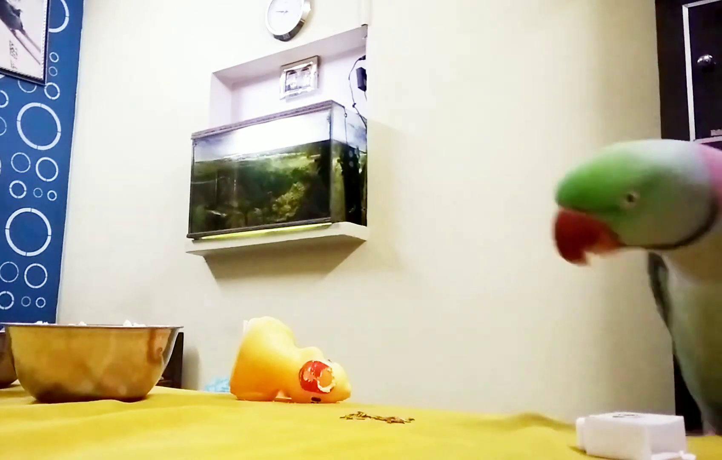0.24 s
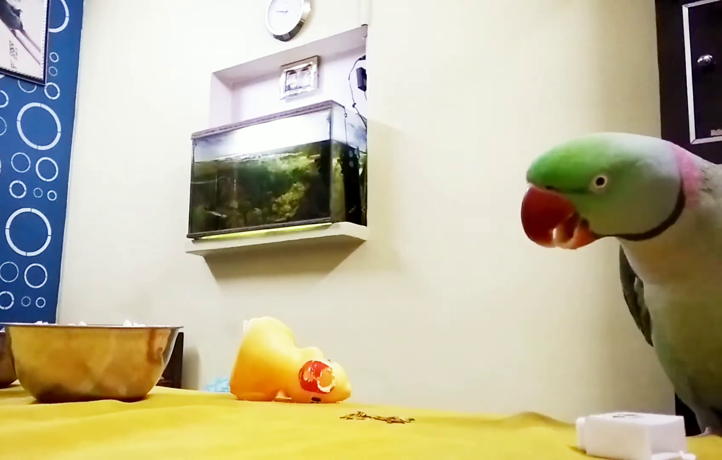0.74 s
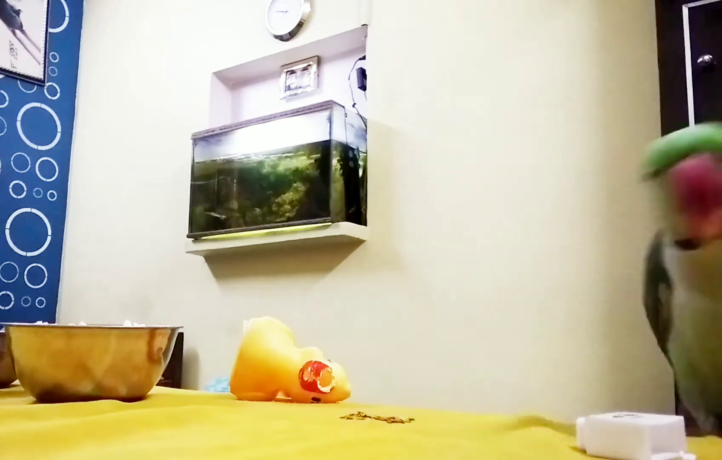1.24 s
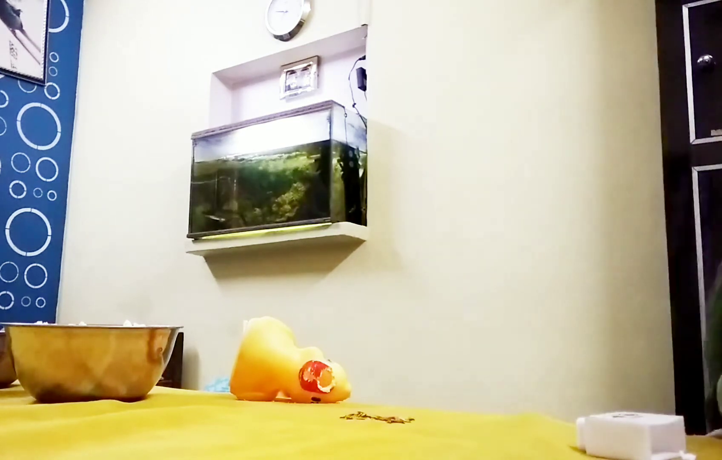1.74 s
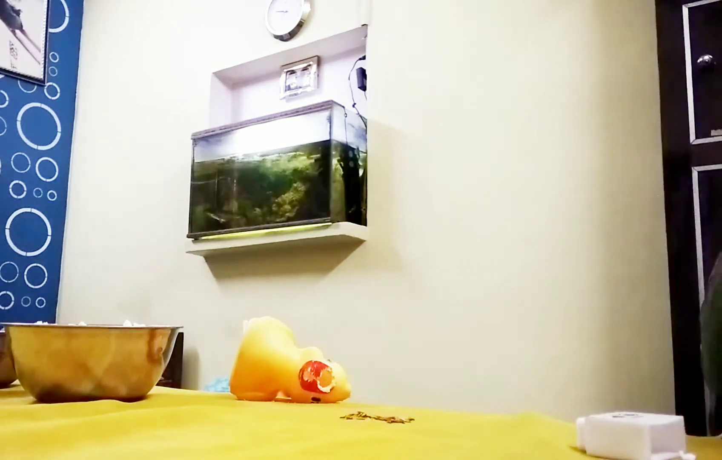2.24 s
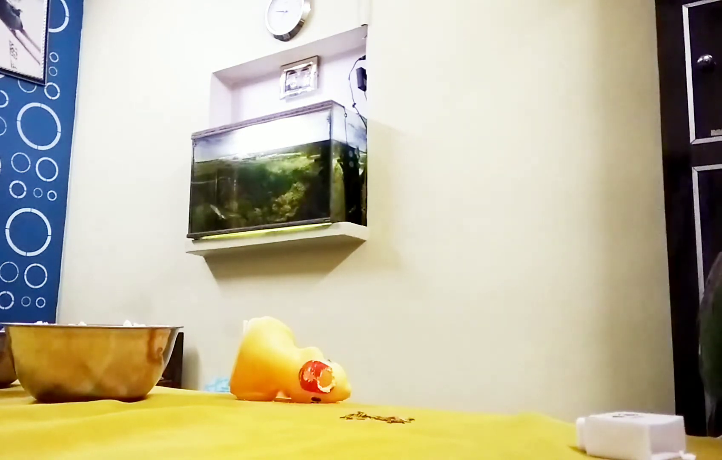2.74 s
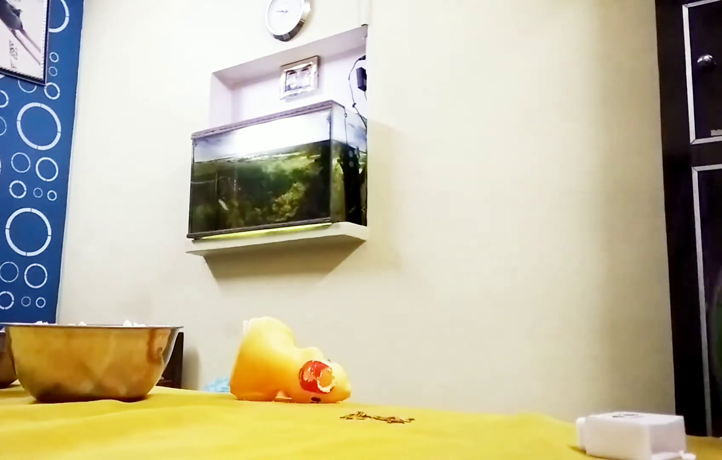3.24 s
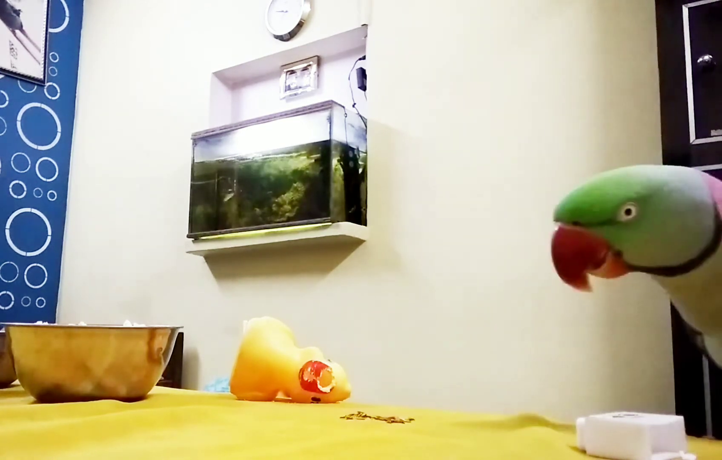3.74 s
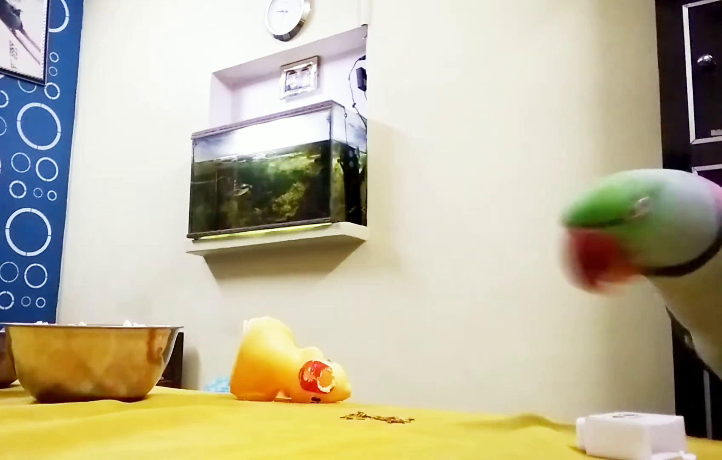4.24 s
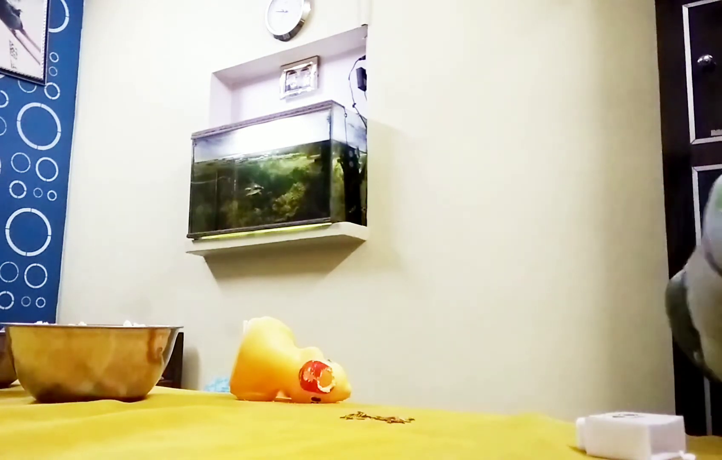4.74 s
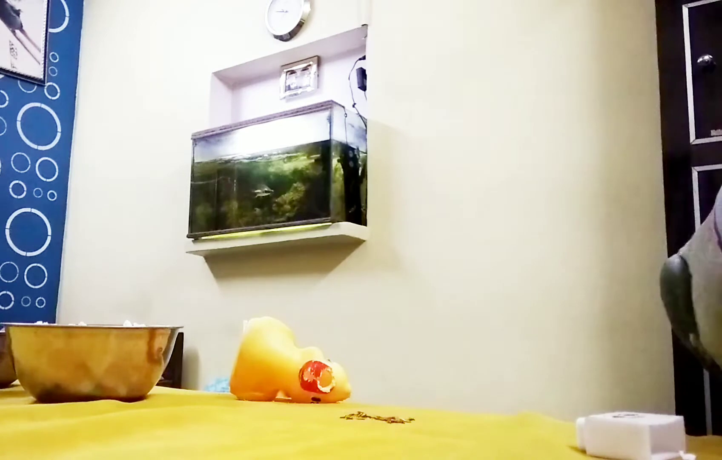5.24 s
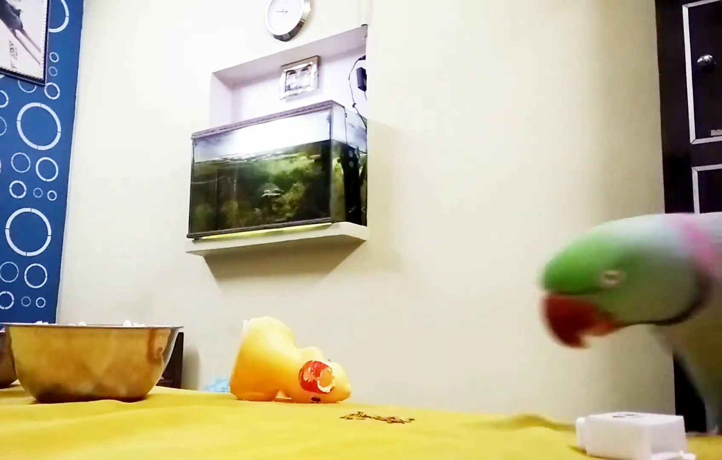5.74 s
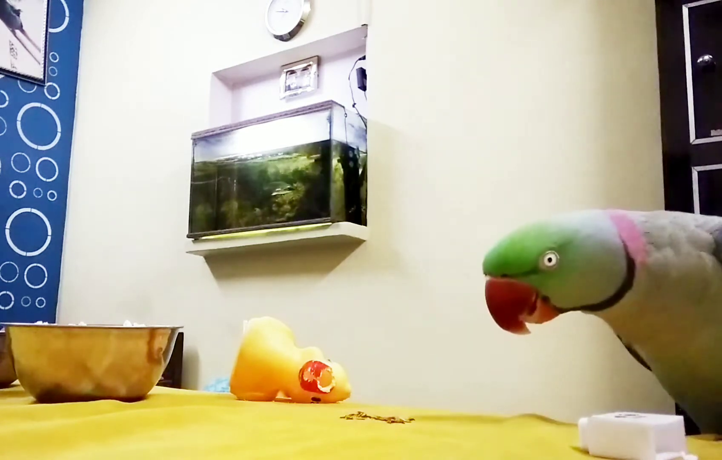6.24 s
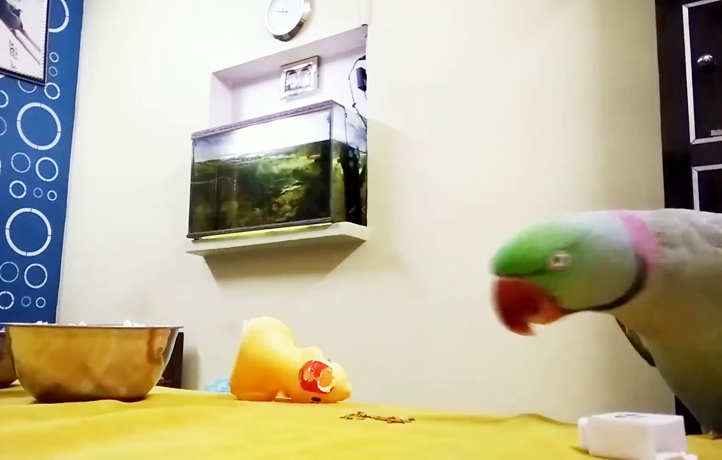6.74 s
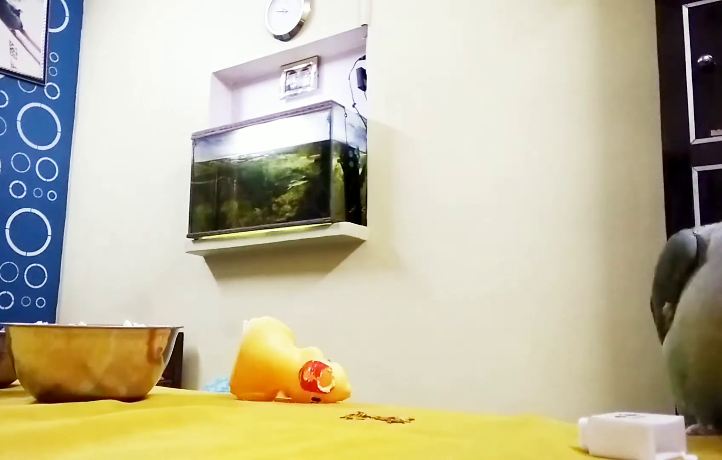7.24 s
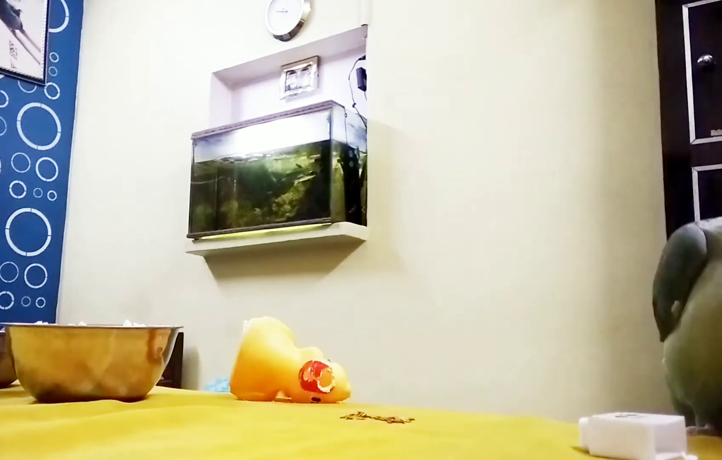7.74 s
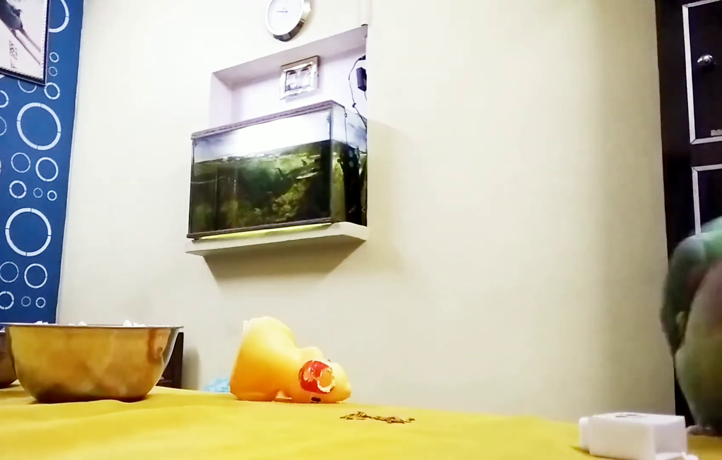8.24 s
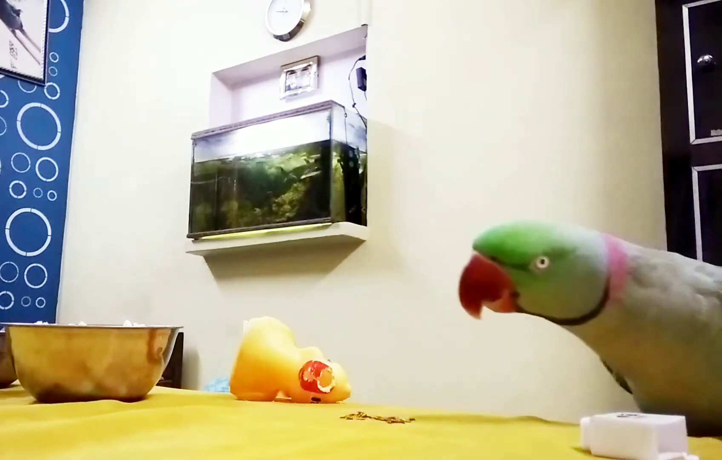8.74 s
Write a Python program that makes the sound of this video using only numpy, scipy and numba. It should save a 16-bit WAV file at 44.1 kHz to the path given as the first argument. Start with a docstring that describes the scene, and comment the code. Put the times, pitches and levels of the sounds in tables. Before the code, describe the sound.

A low, airy fan runs throughout a small reverberant room, with soft wavering draught thumps mainly on the left, notably around 2, 3.5, 4.1-4.6 and 5-5.4 s. A light click comes at 0.5 s. At 0.8 s a close parakeet gives a sharp squawk, about a tenth of a second long: a nasal hold, a leap up, then a break into a falling rasp. A crisp click sounds at 1.75 s. From 2.3 to 3.15 s a quiet, low creaky note climbs and swells, ending abruptly bright and hoarse. Similar squawks follow at 3.95 and 5.25 s, the latter fuller, with a click at 4.9 s. Faint ticks at 6.0 and 6.2 s precede a tiny rough croak at 6.6 s. After a click at 7.5 s, a clear whistle sweeps up from 7.9 s into a rapid, fading trill until 8.1 s. A last click comes near 8.95 s.

```python
"""In a small hard-walled room a parakeet calls six times, close to a phone lying on a bed.
Each call is a gliding stack of wavering partials plus breath; many break to a lower, falling note.
Short damped resonances make the clicks between calls; decaying noise makes the room's echo.
A fan hums as shaped noise, and its draught thumps on the left microphone port as low wavering cycles."""
import sys
import numpy as np
from scipy import signal
from scipy.fft import rfft, irfft, next_fast_len
from scipy.io import wavfile
from scipy.ndimage import uniform_filter1d, minimum_filter1d
from numba import njit

SR = 44100
rng = np.random.default_rng(int(sys.argv[2]) if len(sys.argv) > 2 else 0)


def master_out(mix):
    """Clip the mix to full scale and print it as 16-bit PCM to the path in sys.argv[1]."""
    frames = np.transpose(np.atleast_2d(mix))
    ceiling = np.clip(frames, -1, 1)
    pcm = np.round(ceiling * 32767).astype(np.int16)
    wavfile.write(sys.argv[1], SR, pcm)


N = 396018
TOP_HZ = 14600  # no partials above this, and the microphone's top is cut here


def undb(db):
    """dB to gain."""
    return 10 ** (np.asarray(db) / 20)


def on_log(table, hz):
    """Read (f/Hz, value) points on a log-frequency axis."""
    points = np.array(table)
    return np.interp(np.log(np.maximum(hz, 1)), np.log(points[:, 0]), points[:, 1])


def unit(x):
    """Scale to rms 1."""
    return x / np.sqrt(np.mean(x ** 2))


def decay(t, t60):
    """Exponential envelope that falls 60 dB in t60 seconds."""
    return np.exp(-np.log(1000) * t / t60)


def band(x, hz, octaves):
    """Bell-shaped band around hz."""
    f = np.maximum(np.fft.rfftfreq(x.shape[-1], 1 / SR), 1)
    bell = np.exp(-.5 * (np.log2(f / hz) / octaves) ** 2)
    return irfft(rfft(x) * bell, x.shape[-1])


def walk(rate, size):
    """Random levels held 1 / rate s and slewed twice; spread near 1."""
    k = max(int(SR / rate), 1)
    steps = np.repeat(rng.standard_normal(size // k + 1), k)
    return 1.58 * uniform_filter1d(uniform_filter1d(steps, k), k)[:size]


def add(track, sound, s):
    """Mix a sound into a track at s seconds."""
    i = int(s * SR)
    n = min(sound.shape[-1], N - i)
    track[..., i:i + n] += sound[..., :n]


# Spectrum of the fan's air noise before its overall level is set: f/Hz, level/dB per Hz
FAN_SPECTRUM = [(30, -28), (60, -17.5), (90, -3), (130, -8.5), (170, -1), (280, -11), (430, -6),
                (900, -6.5), (2000, -17), (4500, -25.5), (5800, -35.5), (9000, -27), (11000, -35.5),
                (14300, -40)]
# Balance of the fan between the two ports: f/Hz, left minus right level/dB
FAN_BALANCE = [(60, 10), (110, 10.5), (200, 14), (380, 10), (700, -1), (1290, 3.5), (2370, -1), (4380, 0),
               (8090, -0.5), (14900, 2.5)]
# How alike the fan sounds at the two ports: f/Hz, likeness 0-1 (held to .99 at most)
FAN_LIKENESS = [(60, 0.6), (300, 0.8), (700, 0.57), (1400, 0.17), (4000, 0), (7000, 0.78), (15000, 1)]
# Independent flicker of each band, the last row only closing the top band: band from f/Hz, spread level/dB
FAN_FLICKER = [(0, 1.8), (300, .5), (1500, .6), (7000, 2.2), (20000, 0)]
FAN_DB = -45  # rms of the mean of the two ports


def fan():
    """Air noise whose bands swell together and flicker alone; stronger in the bass at the left port."""
    size = next_fast_len(N)
    f = np.fft.rfftfreq(size, 1 / SR)
    alike = np.clip(on_log(FAN_LIKENESS, f), 0, .99)
    mid, side = rfft(rng.standard_normal((2, size)))
    sign = np.array([[1], [-1]])  # left, right
    ports = np.sqrt(1 + alike) * mid + sign * np.sqrt(1 - alike) * side
    ports = ports * undb(on_log(FAN_SPECTRUM, f) + sign * on_log(FAN_BALANCE, f) / 2)
    out, swell = 0, walk(1.33, size)
    for (lo, flicker_db), (hi, _) in zip(FAN_FLICKER, FAN_FLICKER[1:]):
        part = irfft(ports * ((f >= lo) & (f < hi)), size)
        out = out + part * undb(.25 * swell + flicker_db * walk(20., size))
    return out[:, :N] * undb(FAN_DB) / np.sqrt(np.mean(out.mean(0) ** 2))


# Thumps of draught on the left port: t/s, level/dB before the rise and decay, mean f/Hz
DRAUGHT_GUSTS = [(0.2, -32, 111), (0.379, -34, 192), (1.984, -24, 132), (2.036, -25, 109), (2.08, -26, 187),
                 (3.468, -31, 165.5), (4.11, -33, 182.6), (4.332, -29, 115), (4.442, -24, 133),
                 (4.558, -30, 166), (4.975, -28, 110), (5.397, -28, 112)]
GUST_T60_S = 0.16


def gusts(right_db=-18):
    """Eddies flap across the left port: a few wavering low cycles each, far weaker at the right."""
    out, t = np.zeros(N), np.arange(SR // 4) / SR
    for s, db, hz in DRAUGHT_GUSTS:
        phase = 2 * np.pi * np.cumsum(hz * (1 + .12 * walk(40., len(t)))) / SR
        envelope = np.clip(t / 0.011, 0, 1) * decay(t, GUST_T60_S)
        add(out, undb(db) * np.sin(phase) * envelope, s)
    return out * np.array([[1], [undb(right_db)]])


# Reverberation of the hard walls: band centre f/Hz, t60/s, level/dB
ROOM_BANDS = [(670, 0.36, -10.5), (1300, 0.29, -13.5), (2620, 0.34, -11.5), (5870, 0.32, -7.5),
              (11000, 0.37, -13)]


def room(x, first_echo_s=0.0054):
    """Dense reflections, unrelated left and right, each band dying at its own rate."""
    t = np.arange(SR // 2) / SR
    noise = rng.standard_normal((2, len(t))) * np.clip(t / first_echo_s - 1, 0, 1)
    echo = 0
    for hz, t60, db in ROOM_BANDS:
        tail = noise * decay(t, t60)
        echo = echo + undb(db) * band(tail, hz, 0.38) / np.sqrt(np.sum(tail ** 2) / 2)
    return signal.fftconvolve(x[None], echo, axes=1)[:, :N]


ALIKE_HZ = 6800  # above this the two channels sound nearly in step


def to_ports(x, lead_ms, pan_db):
    """The sound reaches the left port a little before the right; pan is left minus right level."""
    x = np.pad(x, (0, next_fast_len(len(x) + 64) - len(x)))
    f = np.fft.rfftfreq(len(x), 1 / SR)
    lag_s = np.where(f < ALIKE_HZ, 1, .09) * lead_ms / 1000
    right = irfft(rfft(x) * np.exp(-2j * np.pi * f * lag_s), len(x))
    return np.array([x * undb(pan_db / 2), right * undb(-pan_db / 2)])


# Beak and claw clicks: t/s, peak level/dB
CLICK_TIMES = [(0.5026, -32), (1.7481, -22), (1.7668, -35), (4.9241, -28), (6.0054, -39), (6.1663, -30),
               (7.5293, -30), (8.9547, -30)]
# Resonances of a click: nominal f/Hz, level/dB before a tilt of -1 dB an octave and chance, t60/s
CLICK_MODES = [(1600, 0, .012), (3800, 0, .007), (6300, -4, .006), (8800, -3, .006), (13000, -9, .004)]


def clicks():
    """Each click rings a few short resonances, a little different every time, under a dry crack."""
    out, t = np.zeros((2, N)), np.arange(600) / SR
    chance = rng.standard_normal((len(CLICK_TIMES), len(CLICK_MODES), 2))
    for (s, db), draws in zip(CLICK_TIMES, chance):
        ring = undb(-7) * rng.standard_normal(len(t)) * np.exp(-t / .001)  # the dry crack
        for (hz, mode_db, t60), (louder, sharper) in zip(CLICK_MODES, draws):
            gain = undb(mode_db + 2 * louder - np.log2(hz / 1600))
            ring = ring + gain * np.sin(2 * np.pi * hz * (1 + .06 * sharper) * t) * decay(t, t60)
        add(out, to_ports(undb(db) * ring / np.abs(ring).max(), .04, 0), s)
    return out


# Resonances of the throat, shaping partials and breath: f/Hz, level/dB
THROAT_SHAPE = [(1500, -1), (2500, -2), (3800, -0.5), (4600, -4.5), (5200, -15), (7000, -6.5), (8000, -14),
                (9200, -11.5), (10200, -34.5), (12500, -17), (14000, -31)]
# Shading by a nearly shut beak, scaled by how closed it is: f/Hz, level/dB
SHUT_BEAK = [(900, 0), (1600, 5), (2080, -10), (2800, -8), (3800, 2), (5600, -5), (8500, 1)]
TREBLE_HZ = 10500
HAZE_HZ = 11000  # toward this even a clear voice dissolves into hiss


def note(rows, hoarseness, breath_db, closed, odd_db, treble_db, edge_s=.003, count=40):
    """Partials of the syrinx, wavering, the high ones hazy when hoarse, with breath puffed once a cycle."""
    s, hz, db, first_db, slope_db = np.transpose(rows)
    t = np.arange(s[0] - edge_s, s[-1] + edge_s, 1 / SR)
    # roughness changes mostly as the note sets in and as it runs out
    hoarse = np.interp(np.linspace(-1, 1, len(t)) ** 5, [-1, 0, 1], hoarseness)
    hz = uniform_filter1d(np.interp(t, s, hz), size=150)
    # power moves in straight lines: round crests, sharp dips
    level = np.sqrt(uniform_filter1d(np.interp(t, s, undb(2 * db)), size=90))
    waver = .005 * walk(30., len(t)) + .1 * hoarse * walk(1500., len(t))
    phase = 2 * np.pi * np.cumsum(hz * (1 + waver)) / SR

    order = np.arange(1, count)[:, None]
    partial_hz = order * hz
    patchy = undb(1.16 * np.array([walk(45.5, len(t)) for _ in order]))
    shading = closed * on_log(SHUT_BEAK, partial_hz) + odd_db * (order % 2)
    shading = shading + treble_db * (partial_hz > TREBLE_HZ)
    slope = np.interp(t, s, slope_db) * np.log2(order)
    size = undb(on_log(THROAT_SHAPE, partial_hz) + shading + slope) * (partial_hz < TOP_HZ) * patchy
    # the fundamental is set against all the overtones together
    size[0] = undb(np.interp(t, s, first_db)) * np.sqrt(np.sum(size[1:] ** 2, 0))
    size = size * level / np.sqrt(np.sum(size ** 2, 0))
    haze = np.array([walk(500., len(t)) for _ in order])
    haze = haze * (hoarse * order ** 1.5 + (partial_hz / HAZE_HZ) ** 4)
    voice = np.sum(size * np.sin(order * phase - order ** 2 / 9 + haze), 0)
    voice = voice * undb(8 * hoarse * walk(400., len(t)))

    air = rng.standard_normal(len(t)) * (1 + 0.94 * np.cos(phase))
    air_shape = undb(on_log([(300, -30.5)] + THROAT_SHAPE, np.fft.rfftfreq(len(t), 1 / SR)))
    air = unit(irfft(rfft(air) * air_shape, len(t)))
    air = undb(breath_db) * np.sqrt(np.sum(size ** 2, 0)) * air
    edge = np.clip(np.minimum(t - t[0], t[-1] - t) / (2 * edge_s), 0, 1)
    return t[0], np.sqrt(2) * np.sin(np.pi / 2 * edge) ** 2 * (voice + air)


# The fall after the break: share of its length before bending, share of its first f, level/dB added,
# fundamental over the overtones level/dB, slope/dB an octave before the squawk's extra brightness
FALL_CURVE = [(0, 1, -12, 2.5, -7.5), (.2, .92, 2.5, -6.5, -9), (.42, .83, 1, -16, -2),
              (0.618, 0.71, -3.5, -9.5, -7), (0.819, .6, -9, -14, -6), (1, 0.36, -7, -13, 1)]
HOLD_CREEP, ONSET_S, ONSET_DB = 1.59, 0.0041, -10  # creep: power by which the pitch bends upward
TOP_DROOP, TOP_SAG_DB = 0.96, -1.5  # pitch ratio and level change by the end of the top
# colour: fundamental over the overtones level/dB, slope/dB an octave before the extra brightness
HOLD_COLOUR, LEAP_COLOUR, TOP_SLOPE_DB = (-14.5, -4.5), (-6.5, -9), -0.5


def squawk(start, leap, half, snap, end, from_hz, to_hz, top_hz, fall_hz,
           hold_db, dip_db, top_db, fall_db, bend, bright_db, sag_db, pure_db):
    """Rows of the two notes: the syrinx holds, leaps to a top, then breaks to a lower note and falls."""
    top = (pure_db, TOP_SLOPE_DB)
    hold_start = start + ONSET_S
    up = [(start, from_hz, hold_db + ONSET_DB, *HOLD_COLOUR)]
    for u in np.linspace(0, 1, num=5):
        s = hold_start + u * (leap - half - hold_start)
        hz = from_hz + (to_hz - from_hz) * u ** HOLD_CREEP
        up.append((s, hz, hold_db + sag_db * u ** 3, *(LEAP_COLOUR if u == 1 else HOLD_COLOUR)))
    up += [(leap, (to_hz + top_hz) / 2, dip_db, *top),
           (leap + half, top_hz, top_db, *top),
           ((leap + half + snap) / 2, top_hz, top_db, *top),
           (snap, top_hz * TOP_DROOP, top_db + TOP_SAG_DB, *top)]
    down = [(snap + (end - snap) * max(u, 0) ** (1 / bend), fall_hz * ratio, fall_db + db, *colour)
            for u, ratio, db, *colour in FALL_CURVE]
    return [(np.add(rows, [0, 0, 0, 0, bright_db]), kind) for rows, kind in ((up, "hold"), (down, "fall"))]


TRILL_S, TRILL_BEAT_S, TRILL_HURRY_S = 8.024, .0225, 0.00105  # start, first beat's basis, quickening
# the crests close on the top by the catch ratio each beat; troughs drop below them
TRILL_TOP_HZ, TRILL_LAG_HZ, TRILL_CATCH, TRILL_DROP_HZ = 2530, 245, .4, 280
TRILL_DB, TRILL_FADE_DB, TRILL_DEPTH_DB = 1.5, -2.5, -17  # first crest, change a beat, trough
# fundamental over the overtones level/dB, slope/dB an octave
CREST_COLOUR, TROUGH_COLOUR = (10.8, 1.1), (9.6, -0.86)


def trill(count=8):
    """Rows of crests and troughs in turn, each beat shorter, higher and softer."""
    rows = []
    for k in range(count):
        beat, trough = k / 2, k % 2
        s = TRILL_S + TRILL_BEAT_S * beat - TRILL_HURRY_S * beat ** 2
        hz = TRILL_TOP_HZ - TRILL_LAG_HZ * TRILL_CATCH ** beat - TRILL_DROP_HZ * trough
        db = TRILL_DB + TRILL_FADE_DB * beat + TRILL_DEPTH_DB * trough
        rows.append((s, hz, db, *(TROUGH_COLOUR if trough else CREST_COLOUR)))
    return rows


# Where the head points in each call, in time order: left leads right/ms, left minus right level/dB
HEAD_STANCE = [(.07, -1.2), (.2, 3.4), (.075, .2), (.19, .6), (.05, 0), (.18, .5)]
# Squawks: start t/s, leap t/s, half the leap/s, break t/s, end t/s,
# hold from f/Hz, hold to f/Hz, top f/Hz, fall from f/Hz,
# hold level/dB, dip in the leap level/dB, top level/dB, fall level/dB, bend of the fall (1 = plain),
# extra brightness/dB an octave, change over the hold/dB, fundamental over the overtones at the top/dB
SQUAWK_CALLS = [(0.778, 0.837, 0.0087, 0.867, 0.912, 1893, 2063, 2512, 1855, -14.5, -35, -6.5, -3.5, 1.0, -2.5, -2, 15),
                (3.95, 4.012, 0.0077, 4.037, 4.086, 1924, 2110, 2597, 1841, -13, -41, -13.5, -7.5, 1.26, -1.5, -5.5, 17.5),
                (5.235, 5.302, .017, 5.334, 5.388, 1882, 2028, 2457, 1798, -9.5, -10.5, -7, -8, .95, 0, 0.5, 11)]
# Curves of the other notes, the whistle going on into a trill:
# t/s, f/Hz, level/dB, fundamental over the overtones level/dB, slope/dB an octave
RISE_CURVE = [(2.26, 343.5, -42, -6, -1.5), (2.33, 360, -34, -7, -3), (2.38, 396, -34.5, -5, -2.5),
              (2.41, 398.6, -31.5, -10.5, -2.5), (2.47, 406, -31.5, -5, -4.5), (2.55, 447.4, -29.5, -5, -5),
              (2.62, 478.4, -30, -4, -4.5), (2.7, 512, -28.5, -6.5, -3), (2.8, 583, -29, -5.5, -3.5),
              (2.86, 624.5, -32.5, -5.5, -6), (2.93, 711, -31.5, -3.5, -6), (3.0, 755, -25, -7.5, -4.5),
              (3.06, 846, -22.5, -8, -5), (3.09, 892, -14.5, -15, -2.5), (3.115, 948, -12.5, -11, -6.5),
              (3.13, 1104, -17, -6, 0), (3.141, 1134, -19, -13, -4)]
RISE_END_CURVE = [(3.143, 1235, -11.5, -2, -34), (3.154, 980, -13, -16, -14), (3.162, 670, -26, -4, -4)]
CROAK_CURVE = [(6.573, 980.5, -23, 2, -3), (6.58, 1007, -22.5, -9, -5), (6.59, 1164, -19, -3, -3),
               (6.599, 850, -15.5, -10, -6.5), (6.608, 742, -20.5, -11, 3.5), (6.616, 587, -23, 4, -22)]
WHISTLE_CURVE = [(7.87, 1360, -56, 17, -16), (7.925, 1425, -34, 13, -1), (7.94, 1493, -16, 11, 3),
                 (7.965, 1654, -10, 15.3, 4), (8.0, 1918, -5.5, 19.6, 6), (8.016, 2093, -26, 13, -2)]
# Voice of each kind of note: breath under the voice level/dB, beak closure (1 = nearly shut,
# negative = shading reversed), odd overtones level/dB, extra treble level/dB
NOTE_VOICE = dict(hold=(-32, .1, -2.5, -3), fall=(-19.5, -0.6, 0.8, -3.5), long_rise=(-21, 0.54, 2.1, 4.5),
              long_end=(-7, 0.7, 2, 3), croak=(-7, 0.4, -2, -12), whistle=(-42, -0.8, 1, 0))
# Hoarseness 0-1 of each kind of note: at the start, middle, end
NOTE_HOARSENESS = dict(hold=(.1, .065, .04), fall=(.11, .14, .3), long_rise=(.07, .006, .07),
                   long_end=(.4, .4, .4), croak=(.07, .13, .2), whistle=(.015, .015, .02))


def parakeet():
    """The syrinx sings each call's notes toward where the head points, with clicks between calls."""
    out = clicks()
    calls = [squawk(*row) for row in SQUAWK_CALLS]
    calls += [[(RISE_CURVE, "long_rise"), (RISE_END_CURVE, "long_end")],
              [(CROAK_CURVE, "croak")],
              [(WHISTLE_CURVE + trill(), "whistle")]]
    calls.sort(key=lambda call: call[0][0][0][0])  # by the first time of the first note
    for call, (lead_ms, pan_db) in zip(calls, HEAD_STANCE):
        for rows, kind in call:
            s, sound = note(rows, NOTE_HOARSENESS[kind], *NOTE_VOICE[kind])
            add(out, to_ports(sound, lead_ms, pan_db), s)
    return out


def scene():
    """Fan and draught behind, the bird close by, and the room answering its left-port sound."""
    bird = parakeet()
    return fan() + gusts() + room(bird[0]) + bird


@njit
def follow(x, release):
    """Peak follower: instant rise, slow fall."""
    e, out = 1e-9, np.empty(len(x))
    for i in range(len(x)):
        e = max(x[i], e * release)
        out[i] = e
    return out


LIMIT_DB, RELEASE_S = -4.5, 0.054  # peak level where holding down begins, time constant of recovery


def record(dry):
    """The phone's limiter looks a few ms ahead and holds the loudest notes down; the top is cut."""
    peak = follow(np.abs(dry).max(0), np.exp(-1 / (RELEASE_S * SR)))
    gain = minimum_filter1d(np.minimum(undb(LIMIT_DB) / peak, 1) ** .8, size=200)
    held = dry * uniform_filter1d(gain, size=200)
    top_cut = signal.ellip(8, .2, 70, TOP_HZ, fs=SR, output="sos")
    return signal.sosfilt(top_cut, held)


dry = scene()
out = record(dry)
master_out(out)
```